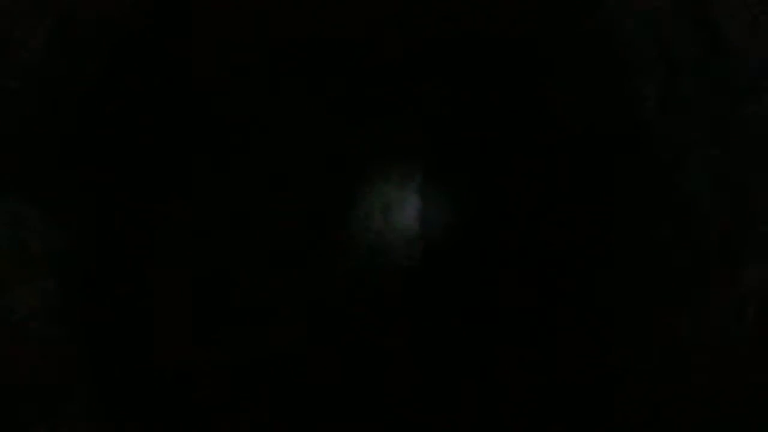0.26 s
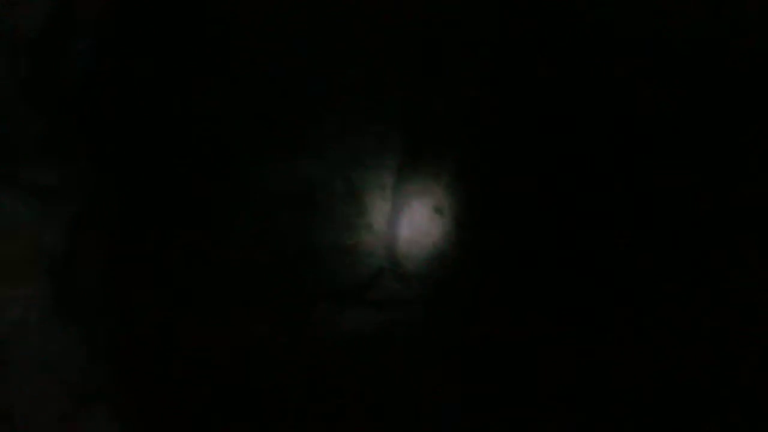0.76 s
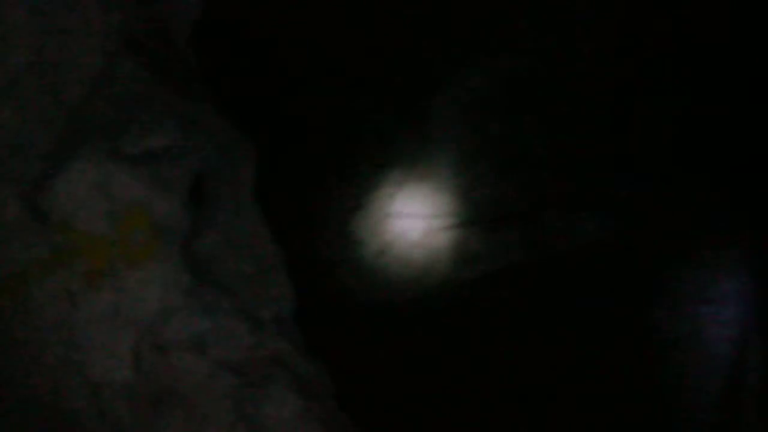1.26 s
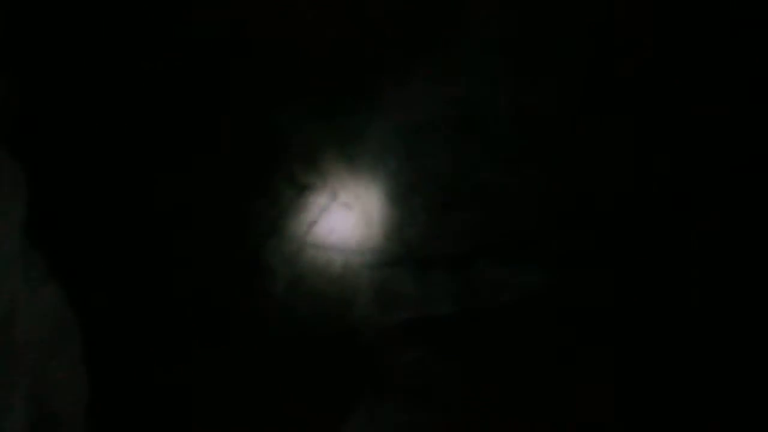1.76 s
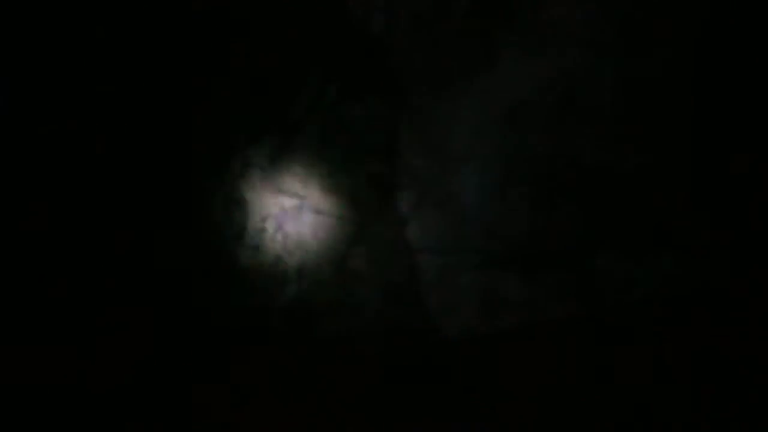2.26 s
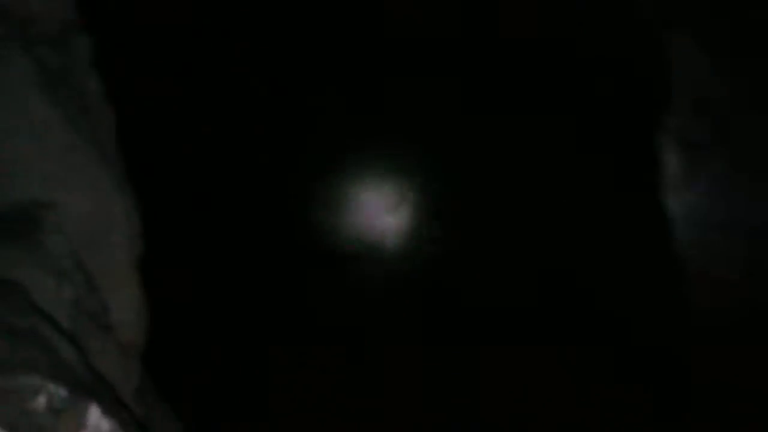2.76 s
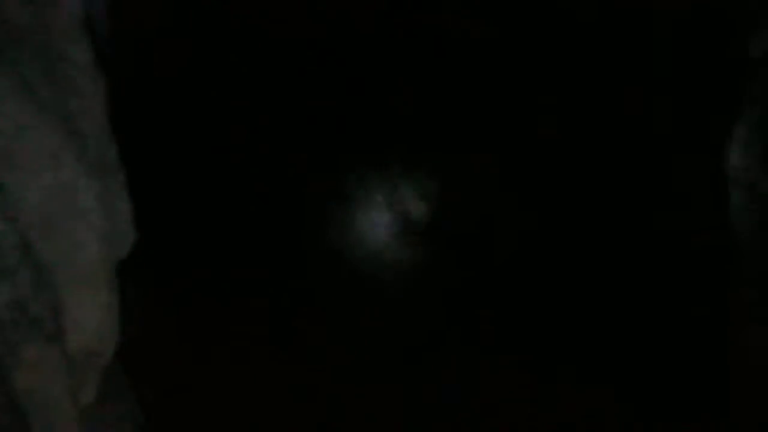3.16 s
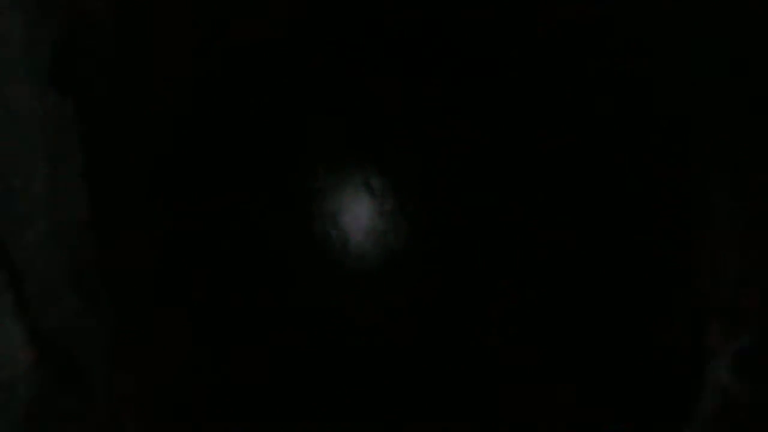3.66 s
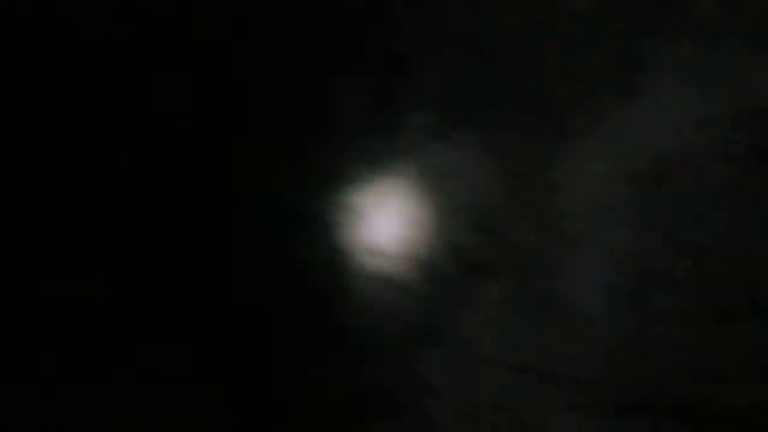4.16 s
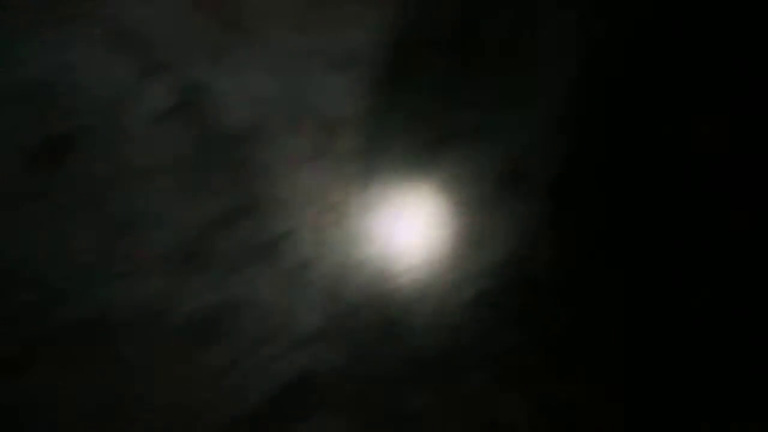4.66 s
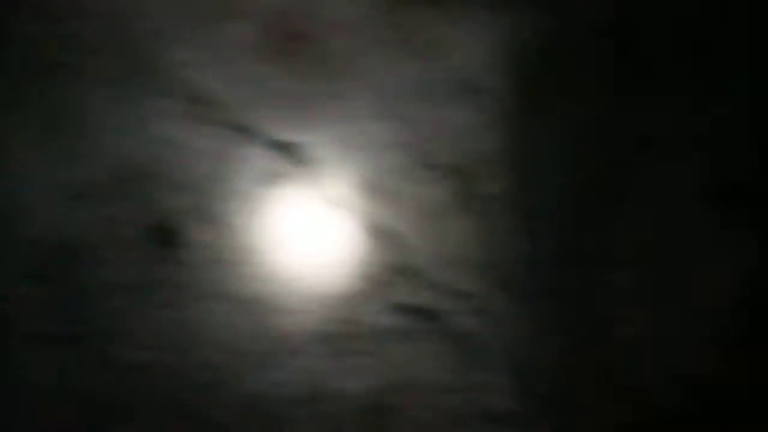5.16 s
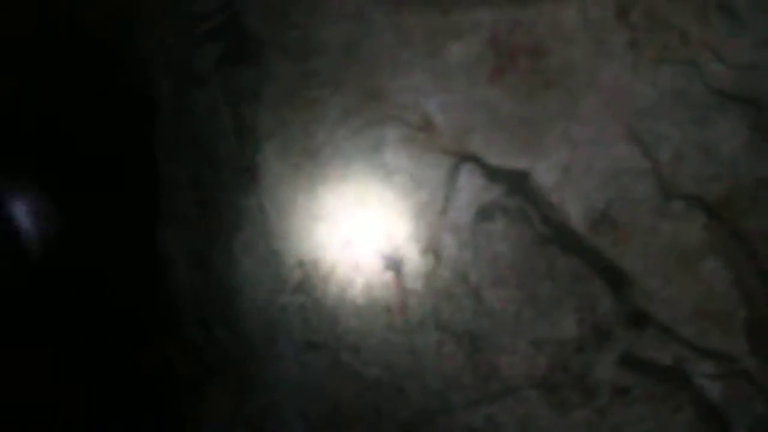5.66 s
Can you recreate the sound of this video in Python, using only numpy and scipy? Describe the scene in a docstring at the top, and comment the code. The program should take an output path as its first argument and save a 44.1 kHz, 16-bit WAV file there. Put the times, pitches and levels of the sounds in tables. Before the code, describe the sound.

Gritty footsteps grind, knock and drag across a stony passage floor, close walls echoing, with soft handling thuds and faint hiss.

```python
"""Boots on grit in a rock tunnel

People walk slowly over a gritty floor in a narrow rock tunnel, heard on a hand-held recorder.
Soles scuff and crunch: random grain clicks, shaped in tone, swell and fade under load.
Stone knocks, dull heel thuds and pebble ticks are short dying sines; close walls add dense short echoes.
The recorder adds low rumble and dull thuds as it moves in the hand, over a faint air hiss.
"""
import sys
import numpy as np
from scipy import signal
from scipy.fft import rfft, irfft, next_fast_len
from scipy.io import wavfile
from scipy.ndimage import uniform_filter1d

SR = 44100
rng = np.random.default_rng(int(sys.argv[2]) if len(sys.argv) > 2 else 0)


def transcribe(signal):
    """Save signal, clipped to [-1, 1], as a 16-bit WAV file at the path in sys.argv[1]."""
    frames = np.atleast_2d(signal).T
    limited = np.clip(frames, -1, 1)
    pcm = np.round(limited * 32767).astype(np.int16)
    wavfile.write(sys.argv[1], SR, pcm)


N = 260181  # samples

# soles dragging over the floor: full_s (swell complete, hold begins), gravel_db, sand_db, earth_db,
# swell_s (for 30 dB, at least 0.02 s), hold_s
SOLE_SCUFFS = [(0.0, -30.5, -36, -45.5, .1, 0.0069), (0.44, -42.5, -48, -72, 0.46, 0.32),
               (0.776, -34.5, -39.5, -37.5, 0.12, 0.11), (1.202, -45.5, -49.5, -55, 0.2, 0.092),
               (1.632, -30, -33.5, -42, 0.4052, 0.011), (2.016, -42.5, -48, -47.5, 1.46, 0.099),
               (2.114, -55, -42, -38, 0.06, 0.044), (2.215, -26.5, -40, -32, -0.06, 0.015),
               (2.29, -36, -43.5, -40, 0.15, 0.12), (2.79, -49.5, -52.5, -70, .5, 0.098),
               (2.997, -32, -37, -51, 0.45, 0.055), (3.46, -44, -47.5, -48, 1.94, 0.072),
               (3.746, -29, -39.5, -45, 0.58, .01), (3.83, -35, -44, -44.5, 0.1, 0.07),
               (4.53, -36, -43.5, -44, 0.26, 0.018), (4.59, -33, -39.5, -49, 0.12, 0.019),
               (4.645, -41, -48, -46.5, -0.1, 0.049), (4.952, -46, -54.5, -51.5, 0.1, 0.23),
               (5.325, -37, -45.5, -44, -0.12, 0.16), (5.663, -53, -65, -50, 3, 0.12)]
# steady floor under the scuffs: gravel_db, sand_db, earth_db
FAR_FEET_DB = (-61, -66.5, -52.5)
# tone of gravel grains: frequency_hz, relative level_db
GRAVEL_TONE = [(180, -31), (300, -4.5), (500, -2.5), (1000, 1.5), (1700, 1.5), (3500, -10), (7000, -26.5),
               (16000, -50)]
# tone of sand grains: frequency_hz, relative level_db
SAND_TONE = [(1800, 3.5), (3000, 4), (4500, 0.5), (7000, -6), (10000, -14.5), (16000, -26.5)]
# the recorder shifting in the hand: time_s, rumble level_db
HAND_RUMBLE = [(0.0, -59), (0.13, -59), (0.51, -50), (0.67, -45), (1.15, -69), (1.5, -53.5), (1.85, -63),
               (2.27, -58), (2.5, -56.5), (2.95, -75), (3.11, -47), (3.4, -43), (3.71, -50), (3.93, -54),
               (4.03, -68), (4.32, -74), (4.5, -67), (4.68, -53), (4.9, -69), (5.2, -76), (5.9, -71)]
# dull thuds through the recorder body: start_s, level_db, pitch_hz
BODY_THUDS = [(.245, -49, 100), (.349, -53, 80), (0.483, -39, 100), (.56, -48, 73), (0.701, -25.5, 137),
              (.795, -40, 60), (.855, -41, 80), (1.415, -30, 98), (3.201, -39, 67), (3.261, -30.5, 127),
              (3.433, -31.5, 75.4), (3.554, -32, 102), (3.905, -35, 90), (4.645, -47, 50)]
# tone of the air hiss: frequency_hz, relative level_db
HISS_TONE = [(18, -56), (30, -95), (394, 0), (499, 1), (684, -19.5), (1430, -1), (3980, -15.5),
             (16000, -30.5)]
# how fast the echo tail dies: frequency_hz, t60_s
TAIL_T60 = [(150, 0.47), (400, 0.34), (1000, 0.37), (2500, 0.21), (6000, 0.18), (12000, 0.088)]
# strength of each band of the echo tail: frequency_hz, level_db
TAIL_LEVEL = [(150, 0.96), (400, 4), (1000, 3.8), (2500, 2.73), (6000, 0.75), (12000, 2.1)]
# the nearest walls, floor and roof: delay_s, level_db
NEAR_SURFACES = [(.0028, -8), (.0065, -13), (.0095, -14.5), (.014, -12), (.024, -16.5)]
# stones knocking and dull heel thuds on the floor: start_s, level_db, pitch_hz, ring_cycles
FLOOR_KNOCKS = [(0.069, -8.5, 1370, 0.44), (0.301, -28, 1550, 2.1), (0.551, -20.5, 2340, 0.83),
                (0.943, -14.5, 1100, 0.73), (0.952, -14.5, 937, 2.2), (1.551, -30, 262, 0.92),
                (1.835, -27, 1320, 1.3), (1.985, -6.5, 1410, 2.2), (2.104, -28.5, 232, 1),
                (2.186, -15.5, 1530, 1.2), (2.204, -7.5, 935, 0.4), (2.212, -14, 2430, 6.3),
                (2.317, -6.5, 1070, 1.3), (2.91, -36.5, 202, 0.72), (2.957, -9.5, 870, 0.33),
                (2.9591, -10.5, 1460, 0.45), (3, -8, 1560, 0.76), (3.045, -14, 2260, 1.8),
                (3.2008, -16, 2480, .5), (3.204, -6.5, 2800, 0.35), (3.207, -14, 1490, 1.3),
                (3.624, -17.5, 1000, 0.76), (3.629, -14, 1180, 2.1), (3.806, -12, 1300, 1.1),
                (3.812, -15.5, 1290, 3.2), (3.845, -17, 1350, 3), (4.359, -28, 1320, 1.5),
                (4.962, -33, 534, .8), (5.111, -22, 615, 1), (5.271, -25, 1130, 0.69),
                (5.272, -34, 192, 0.77), (5.307, -12, 1260, .5), (5.457, -13, 2400, 0.99),
                (5.668, -30, 1150, 0.76)]
# soles crushing into gravel: start_s, level_db (nominal peak), gravel pitch_hz,
# sand_db and dust_db (relative to gravel), fade t60_s
SOLE_CRUNCHES = [(0.073, -9.5, 1540, -12.5, -29, 0.28), (0.3, -23.5, 1600, -34, -42, 0.15),
                 (0.554, -26, 2730, -31, -36, 0.21), (0.635, -19.5, 1670, -15, -44, 0.38),
                 (0.715, -36, 1500, -3, -3, .1), (0.779, -21, 1730, -2, -26, 0.16),
                 (0.944, -16, 806, -45, -31, 0.4), (1.328, -27, 1410, -27, -17, 0.1),
                 (1.456, -29, 1190, -2, -30, 0.15), (1.56, -6, 1330, -2, -31, 0.13),
                 (1.659, -11, 1340, -25, -36, 0.14), (1.699, -29, 1170, 1, -26, 0.15),
                 (1.865, -29, 1900, -20, -34, .2), (1.975, -6.5, 1190, -18, -42, 0.18),
                 (2.029, -27, 1350, -11, -34, 0.16), (2.108, -20, 1230, -18, -6, 0.16),
                 (2.184, -9, 1300, -12, -21, 0.17), (2.202, -10.5, 1900, -20.5, -26, 0.088),
                 (2.247, -10, 784, -29, -34, 0.14), (2.315, -4, 1100, -12.5, -28, 0.14),
                 (2.358, -15.5, 1200, -9, -17, 0.18), (2.724, -27, 1110, -10, -31, 0.12),
                 (2.928, -18.5, 1960, -12, -21, 0.27), (2.957, -13.5, 990, -21, -38, 0.19),
                 (3.044, -10, 2230, -41, -40, 0.23), (3.198, -13, 1980, -26, -52, 0.11),
                 (3.222, -19, 2260, -33, -44, 0.15), (3.622, -10, 1160, -18, -45, 0.038),
                 (3.682, -7, 2600, -17, -20, 0.21), (3.808, -11, 1350, -17, -41, 0.4),
                 (3.878, -16.5, 1420, -16, -40, 0.18), (4.197, -31.5, 1270, -5, -22, 0.26),
                 (4.36, -26, 1360, -21, -41, 0.38), (4.427, -20, 580, -27, -40, 0.33),
                 (4.546, -14.5, 615, -4, -31, 0.047), (4.575, -13.5, 1300, -26, -35, 0.18),
                 (4.677, -22.5, 510, -13, -27, 0.19), (4.96, -30, 1520, -8, -25, 0.18),
                 (5.109, -16, 900, -11, -10.5, 0.073), (5.228, -21, 600, -15, -24, 0.28),
                 (5.271, -16, 1180, -28, -22, 0.48), (5.292, -10, 735, -8.5, -29, 0.11),
                 (5.452, -11.5, 2210, -14, -39, 0.26)]
# tone of fine dust: frequency_hz, relative level_db
DUST_TONE = [(5000, 2), (9000, 5), (12000, -3), (16000, -4)]
# small pebbles ticking: start_s, level_db, pitch_hz
PEBBLE_TICKS = [(.3034, -34, 3480), (0.4893, -29.5, 4950), (1.1553, -34, 5080), (1.2007, -39, 4000),
                (1.334, -37, 7000), (1.484, -28, 6690), (1.705, -25, 4440), (1.7907, -29.5, 6000),
                (1.981, -20, 6100), (2.08, -25, 5670), (2.5411, -38, 6560), (2.733, -26.5, 4800),
                (2.7745, -33, 4660), (2.836, -33, 4630), (2.886, -34, 4570), (2.929, -21.5, 7400),
                (3.0598, -16, 4300), (3.035, -28, 10000), (3.1142, -35, 9000), (3.2035, -39, 9340),
                (3.269, -35.5, 5900), (3.5952, -20, 4900), (3.8087, -10.5, 6100), (4.1765, -37, 4740),
                (4.207, -44, 5500), (4.773, -38, 3000), (4.8622, -32, 4700), (4.874, -36, 3000),
                (4.9043, -27.5, 3800), (4.961, -37, 7450), (5.105, -47, 5900), (5.118, -21.5, 5400),
                (5.2184, -38, 8000), (5.2245, -28.5, 10000), (5.3086, -15.5, 8460), (5.454, -15, 4800)]

LIFT_DB_PER_S = 164  # fade of a scuff as the sole lifts
THUD_CYCLES = 0.42
HISS_DB = -53.5
FIRST_ECHO_S = 0.0026  # start of the dense tail
WALK_S = 0.012  # time from one echo pattern to the next
GRAIN_CREST_DB = 14.5  # allowance from nominal peak to rms
RISE_CYCLES = 11.6  # coarse, low gravel settles more slowly than fine
TOP_HZ = 15900


def amp(db):
    """Decibels to gain."""
    return 10 ** (np.asarray(db) / 20)


def unit(x):
    """Scale to rms 1."""
    return x / np.sqrt(np.mean(x ** 2))


def curves(table):
    """Columns of a timed table, one value a sample."""
    time_s, *columns = np.transpose(table)
    return [np.interp(np.arange(N) / SR, time_s, column) for column in columns]


def colour(x, points):
    """Shape the spectrum by (Hz, dB) points on a log frequency scale; rms 1."""
    hz, db = np.transpose(points)
    size = next_fast_len(len(x))
    f = np.maximum(np.arange(size // 2 + 1) * SR / size, 1)
    gain = amp(np.interp(np.log(f), np.log(hz), db, left=-80))
    return unit(irfft(rfft(x, size) * gain, size)[:len(x)])


def band(x, hz, width):
    """Resonance with a width given as a share of its pitch."""
    return signal.lfilter(*signal.iirpeak(min(hz, .45 * SR), 1 / width, fs=SR), x)


def grains(rate, spread_db, clump_db=0):
    """Random clicks at a mean rate per second, many small and a few large, in clumps some 20 ms long."""
    hit = rng.random(N) < rate / SR
    size = np.minimum(rng.exponential(size=N), 3.)
    steps = np.repeat(rng.standard_normal(N // 600 + 1), 600)[:N]
    clump = unit(uniform_filter1d(steps, size=600))
    return unit(hit * rng.choice([-1, 1], N) * amp(spread_db * size + clump_db * clump))


def add(out, x, s):
    """Mix x in at s seconds."""
    i = int(s * SR)
    out[i:i + len(x)] += x[:N - i]


def ping(hz, cycles):
    """One blow: a sine that swells over half a cycle and dies in a few; peak 1."""
    turn = np.arange(int(8 * (cycles + 1) * SR / hz)) * hz / SR
    swell = 1 - np.exp(-turn / 0.55)
    x = np.sin(2 * np.pi * turn) * swell * np.exp(-turn / max(cycles, .2))
    return x / np.max(np.abs(x))


def sole_scuffs(sand):
    """Soles drag on: gravel, sand with lone crackles, and the dull push on packed earth."""
    t = np.arange(N) / SR
    power = amp(FAR_FEET_DB)[:, None] ** 2
    for s, *db, swell, hold in SOLE_SCUFFS:
        swell_db = -30 * np.maximum(s - t, 0) / max(swell, .02)
        lift_db = -LIFT_DB_PER_S * np.maximum(t - s - hold, 0)
        power = power + (amp(db)[:, None] * amp(swell_db + lift_db)) ** 2
    gravel = colour(grains(1800, 3.6, clump_db=1.6), GRAVEL_TONE)
    crackle = amp(-9) * colour(grains(90, 3.), SAND_TONE)
    earth = unit(band(band(grains(800, 2.2, clump_db=3.0), 363, 2.5), 363, 2.5))
    return np.sum(np.sqrt(power) * [gravel, sand + crackle, earth], axis=0)


def handling():
    """Low rumble and soft thuds reach the microphone through the body of the recorder."""
    rumble = unit(band(band(grains(200, 1.1), 68, 1.44), 61, 1.9))
    out = amp(curves(HAND_RUMBLE)[0]) * rumble
    for s, db, hz in BODY_THUDS:
        add(out, amp(db) * ping(hz, THUD_CYCLES), s)
    return signal.lfilter(*signal.butter(1, 45, "high", fs=SR), out)


def air_hiss():
    """Faint steady hiss at the microphone: random noise shaped in tone."""
    return amp(HISS_DB) * colour(rng.standard_normal(N), HISS_TONE)


def echo_pattern():
    """A few strong near reflections stand out within a dense noise tail, each band fading at its own pace."""
    t = np.arange(int(.6 * SR)) / SR
    noise, out = rng.standard_normal(len(t)), np.zeros(len(t))
    for hz in 100 * 2 ** np.arange(0, 7.4, .5):  # half-octave steps
        t60, db = (np.interp(np.log(hz), np.log(np.array(p)[:, 0]), np.array(p)[:, 1])
                   for p in (TAIL_T60, TAIL_LEVEL))
        fade = amp(-60 * t / t60) * (t > FIRST_ECHO_S)
        tail = band(band(noise, hz, 0.66), hz, 0.66) * fade
        out += amp(db) * tail / np.sqrt(np.sum(fade ** 2))
    for s, db in NEAR_SURFACES:
        i = int(s * rng.uniform(.85, 1.15) * SR)  # each delay varies a little
        out[i] += amp(db) * rng.choice([-1, 1])
    return out


def tunnel(x, count=10):
    """Direct sound plus echoes; grains break at ever new places, so echo patterns take turns."""
    turn, out = np.arange(N) / SR / WALK_S, x.copy()
    for k in range(count):
        away = np.abs((turn - k + count / 2) % count - count / 2)
        share = np.cos(np.pi / 2 * np.minimum(away, 1))  # equal-power blend
        out += signal.fftconvolve(x * share, echo_pattern())[:N]
    return out


def floor_knocks():
    """Stones knocking and dull heel thuds on the floor, each a short dying sine."""
    out = np.zeros(N)
    for s, db, hz, cycles in FLOOR_KNOCKS:
        add(out, amp(db) * ping(hz, cycles), s)
    return out


def sole_crunches(sand):
    """Bursts of breaking grains: gravel rings round its pitch, sand and dust hiss with it."""
    out, clicks = np.zeros(N), grains(2500, 4., clump_db=2.)
    clicks = signal.lfilter(*signal.butter(1, 5000, fs=SR), clicks)  # larger stones meet more softly
    dust = colour(grains(5000, 3.5, clump_db=2.), DUST_TONE)
    t = np.arange(SR // 2) / SR
    for s, db, hz, sand_db, dust_db, t60 in SOLE_CRUNCHES:
        i = int(s * SR)
        now = slice(i, i + len(t))
        rise = np.sqrt(np.minimum(t * hz / RISE_CYCLES, 1))
        fade = amp(-60 * np.maximum(t - RISE_CYCLES / hz, 0) / t60)
        press = (rise * fade)[:N - i]
        gravel = unit(band(band(clicks[now], hz, 1.67), hz, 1.12) * press)
        hiss = unit(sand[now] * press)
        fizz = unit(dust[now] * press)
        # the load on the sole sets the energy, chance sets the grains
        energy = np.sqrt(np.mean(press ** 2))
        burst = gravel + amp(sand_db) * hiss + amp(dust_db) * fizz
        add(out, amp(db - GRAIN_CREST_DB) * energy * burst, s)
    return out


def pebble_ticks():
    """A pebble snaps once, then bounces 2 to 6 ms later, softer and at another pitch."""
    out = np.zeros(N)
    for (s, db, hz), chance in zip(PEBBLE_TICKS, rng.random((len(PEBBLE_TICKS), 2))):
        add(out, amp(db) * ping(hz, .6), s)
        bounce = ping(hz * (.7 + .6 * chance[0]), .6)
        add(out, amp(db - 5) * bounce, s + .002 + .004 * chance[1])
    return out


def scene():
    """Feet in the tunnel, handling and faint air hiss at the microphone."""
    sand = colour(grains(3000, 3.8, clump_db=2.2), SAND_TONE)
    feet = sole_scuffs(sand) + floor_knocks() + sole_crunches(sand) + pebble_ticks()
    # keep deep bass out of the foot sounds
    feet = signal.lfilter(*signal.butter(3, 140, "high", fs=SR), feet)
    return (tunnel(feet) + handling() + air_hiss())[None]


def record(dry):
    """The recorder cuts the top with a steep low-pass."""
    return signal.sosfilt(signal.ellip(12, .2, 80, TOP_HZ, fs=SR, output="sos"), dry)


dry = scene()
out = record(dry)
transcribe(out)
```